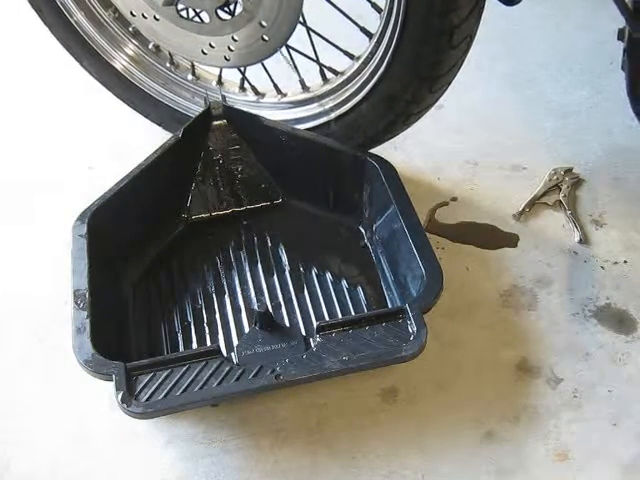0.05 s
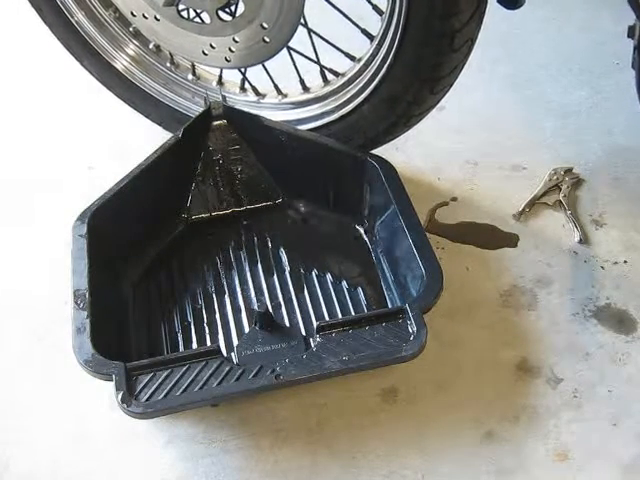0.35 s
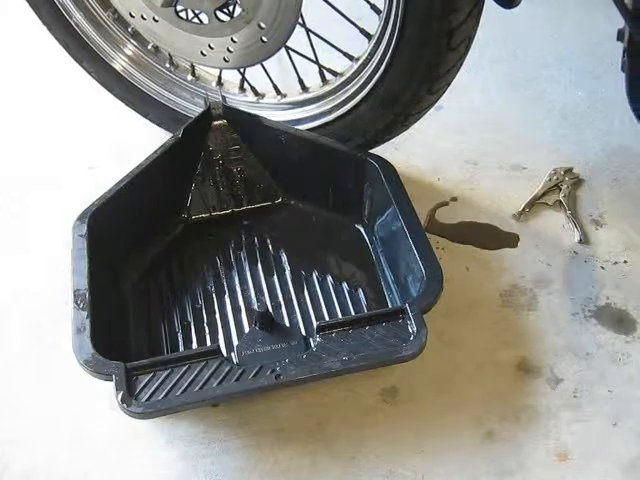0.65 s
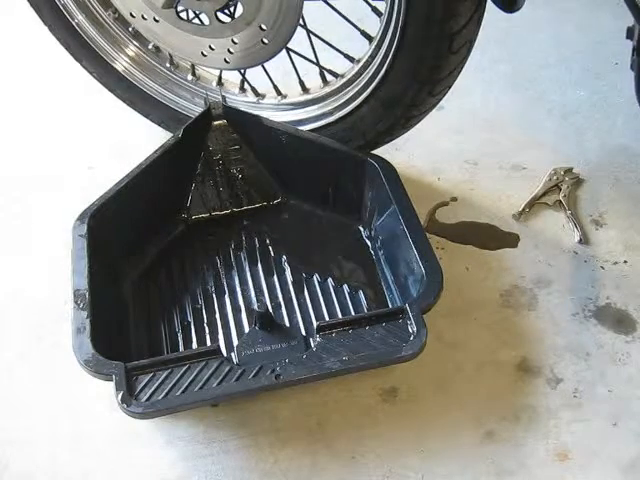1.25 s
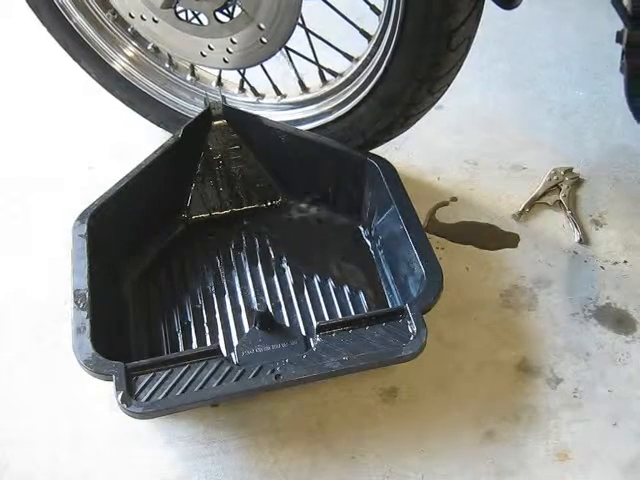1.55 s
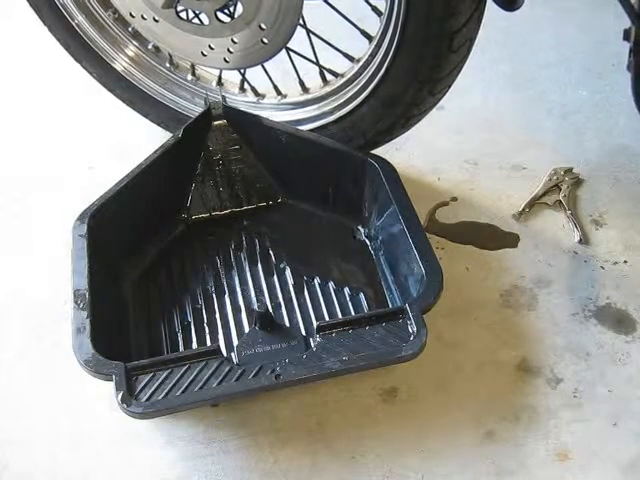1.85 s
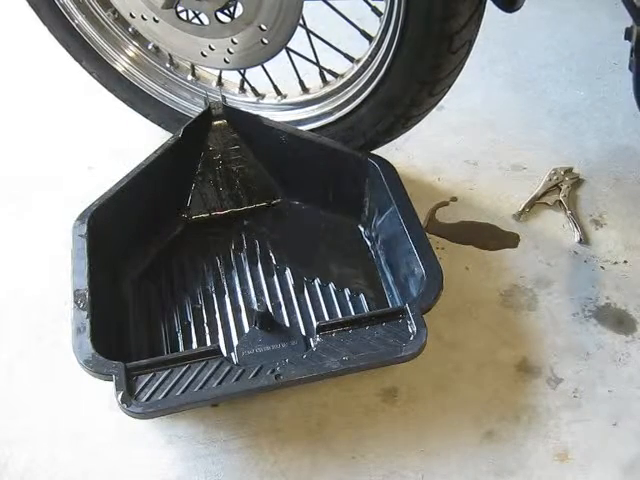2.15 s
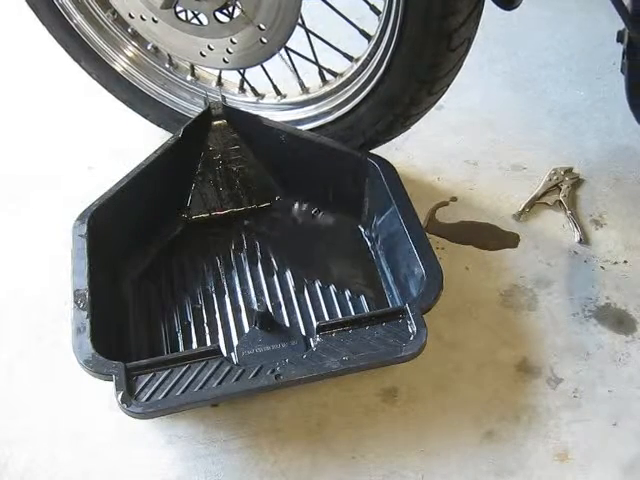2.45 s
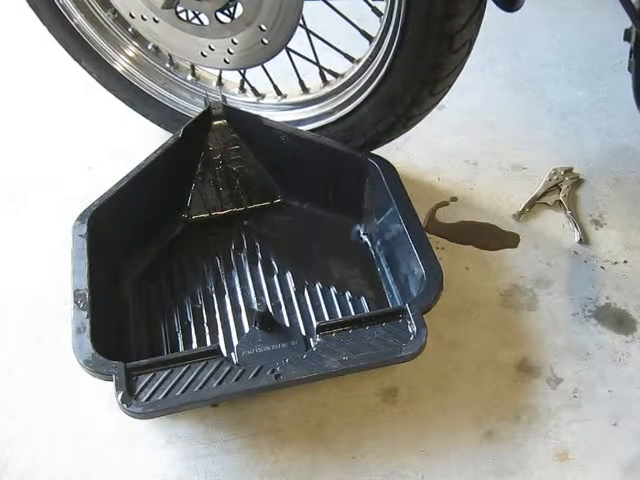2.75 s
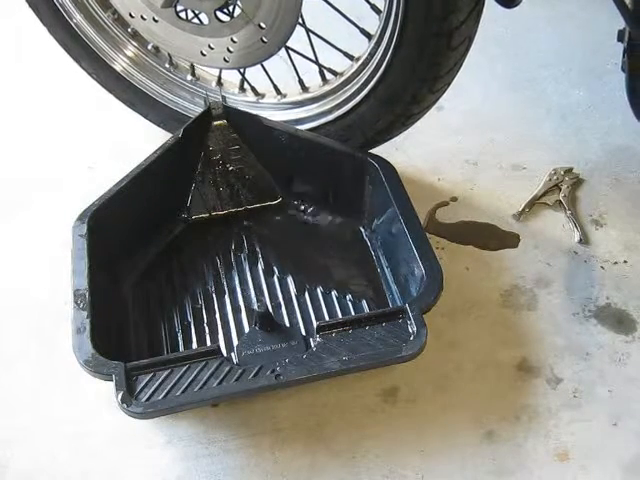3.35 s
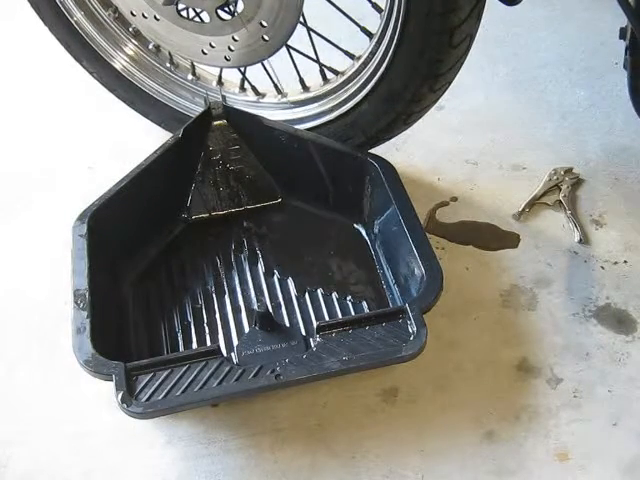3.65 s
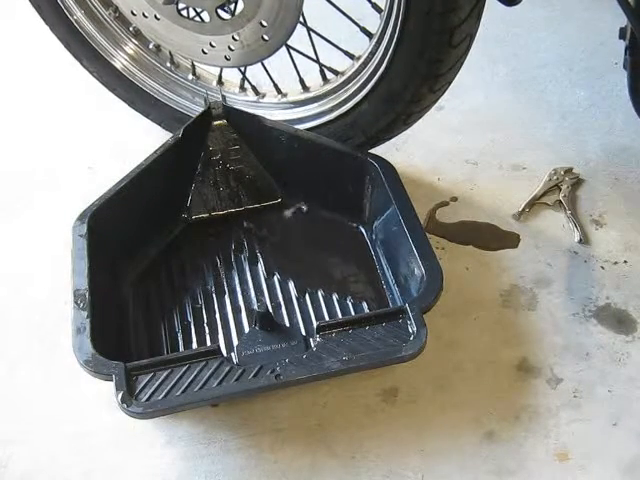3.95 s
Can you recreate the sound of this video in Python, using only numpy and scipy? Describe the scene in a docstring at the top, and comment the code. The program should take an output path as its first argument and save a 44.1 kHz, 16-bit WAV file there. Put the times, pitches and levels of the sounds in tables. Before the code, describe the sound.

Faint drops of oil plop and splutter into a plastic drain pan in a garage.

```python
"""Drops of the last oil draining from a motorcycle fall into a plastic pan on a garage floor.
Each impact slaps the shallow oil, and most excite the pan's damped modes. Bubbles pop,
air gurgles in the drain, and oil and air splutter, with two strong squirts at the end.
The garage reverberates briefly; under it lie a steady hiss and a low drone like far traffic."""
import sys
import numpy as np
from scipy import signal
from scipy.fft import rfft, irfft
from scipy.io import wavfile

SR = 44100
rng = np.random.default_rng(int(sys.argv[2]) if len(sys.argv) > 2 else 0)


def log_audio(samples):
    """Write samples as a 16-bit WAV file to the path given in sys.argv[1]."""
    # one column per channel
    frames = np.atleast_2d(samples).T
    # limit to full scale, then quantise
    limited = np.clip(frames, -1, 1)
    pcm = np.round(limited * 32767).astype(np.int16)
    wavfile.write(sys.argv[1], SR, pcm)


N = 176400
TIME = np.arange(N) / SR
HZ = np.fft.rfftfreq(N, 1 / SR)


def amp(db):
    """Amplitude ratio: a factor of ten per 20 dB."""
    return 10 ** (np.asarray(db) / 20)


def unit(x):
    """Normalisation to an rms of 1."""
    return x / np.sqrt(np.mean(x ** 2) + 1e-20)


def read(points, hz):
    """Interpolation of a table on a log-frequency axis."""
    f, value = np.transpose(points)
    return np.interp(np.log(hz + 1), np.log(f + 1), value)


def add(mix, start_s, sound):
    """Superposition: a sound sums into the mix from its start time."""
    part = mix[round(start_s * SR):][:len(sound)]
    part += sound[:len(part)]


def colour(x, points):
    """Linear filtering: the spectrum is multiplied by a gain curve given in dB."""
    return irfft(rfft(x) * amp(read(points, HZ)), N)


def swell(t, swell_s):
    """Critically damped envelope: it rises to 1 at the swell time, then decays."""
    return t / swell_s * np.exp(1 - t / swell_s)


def ring(hz, swell_s, glide=0):
    """Damped oscillation whose pitch may glide, in octaves per second."""
    t = TIME[:SR // 10]
    phase = 2 * np.pi * np.cumsum(hz * 2 ** (glide * t)) / SR
    return swell(t, swell_s) * np.sin(phase)


def hiss():
    """Stationary broadband noise: the steady background of the room."""
    # Room noise spectrum (frequency [Hz], relative density [dB])
    spectrum = [(15, -65), (25, -20), (96, -3.5), (224, -8), (264, -11.5), (342, -9.5), (423, -12),
                (602, -14), (661, -13), (710, -13), (964, -20), (2050, -22.5), (3780, -20.5), (5650, -31),
                (6980, -58.5), (9070, -96.5)]
    return amp(-46.5) * unit(colour(rng.standard_normal(N), spectrum))


def drone():
    """Amplitude-modulated noise: a far, hollow drone swells and fades around a narrow-band hum."""
    # Drone spectrum (frequency [Hz], relative density [dB])
    spectrum = [(60, -28), (150, -5.5), (280, -11), (320, -3.5), (365, 0), (430, -3), (480, -4.5),
                (545, -2.5), (680, -20), (1000, -19), (2000, -71)]
    # Envelopes of the drone's body and its hum (time [s], level [dB])
    body_levels = [(0, -45.5), (.3, -43), (.5, -35), (.8, -36), (1.1, -40), (1.6, -51.5), (3.0, -56.5),
                   (3.55, -44.5), (4, -51)]
    hum_levels = [(0, -57), (.3, -50), (.58, -37.5), (.9, -41), (1.1, -37.5), (1.4, -48.5), (1.9, -62),
                  (2.3, -48), (2.7, -62), (3.42, -44), (3.7, -50), (4, -54)]
    hum_hz, width_hz = 334.8, 88
    body = unit(colour(rng.standard_normal(N), spectrum))
    band = 1 / (1 + (2 * (HZ - hum_hz) / width_hz) ** 2) ** 2
    hum = unit(irfft(band * np.exp(2j * np.pi * rng.random(len(HZ))), N))
    body_gain = amp(np.interp(TIME, *np.transpose(body_levels)))
    hum_gain = amp(np.interp(TIME, *np.transpose(hum_levels)))
    return body_gain * body + hum_gain * hum


def garage(x):
    """Reverberation: convolution with a diffuse tail, each band decaying at its own exponential rate."""
    # Reverberation time of the garage (frequency [Hz], T60 [s])
    decay_times = [(200, 0.52), (1000, 0.39), (3000, 0.37), (7000, 0.43)]
    build_up_s = 0.0086
    hz, t, bands = signal.stft(rng.standard_normal(SR // 2), SR, nperseg=256)
    decay = amp(-60 * t / read(decay_times, hz)[:, None])
    tail = signal.istft(bands * decay, SR)[1]
    tail *= np.minimum(TIME[:len(tail)] / build_up_s, 1) ** 2
    return signal.fftconvolve(x, tail / np.linalg.norm(tail))[:N]


def pan_resonance(x):
    """Resonance: the pan lifts the bands around its modes; the overall level is preserved."""
    # Modes of the pan (frequency [Hz], width [Hz], gain [dB])
    modes = [(2010, 82, 6.5), (3120, 210, 5), (3830, 68, 3), (4320, 90, 5)]
    lift_db = sum(db / (1 + (2 * (HZ - hz) / width) ** 2) for hz, width, db in modes)
    return np.std(x) * unit(irfft(rfft(x) * amp(lift_db), N))


def gurgles():
    """Bubble resonance: air drawn through the oil gives soft blips, roughened by random modulation."""
    # Air bubbles in the drain (time [s], frequency [Hz], level [dB], swell time [s])
    bubbles = [(0.109, 2825, -48, 0.012), (0.865, 2417, -41, 0.011), (0.869, 3080, -39, 0.0092),
               (.868, 3680, -41, 0.0075), (0.925, 3176, -32.5, 0.0078), (.933, 3650, -37.5, 0.0046),
               (.958, 3360, -41, 0.0088), (.985, 2290, -38.5, 0.0098), (.992, 1527, -45, 0.0073),
               (1.009, 4470, -46, 0.005), (1.026, 3760, -39.5, 0.0075), (1.03, 3150, -38, 0.0051),
               (1.040, 2014, -38.5, 0.01), (1.138, 1600, -38.5, 0.0022), (1.143, 2040, -29.5, .003),
               (1.366, 2020, -47, 0.0097), (1.865, 1122, -43.5, 0.021), (2.028, 2566, -34.5, 0.0051),
               (2.055, 2830, -42, 0.005), (2.085, 2526, -32, 0.0034), (2.134, 1083, -40.5, 0.0094),
               (2.637, 1613, -42, 0.0048), (2.686, 4800, -40, 0.0031), (2.700, 2670, -30, 0.004),
               (2.716, 1190, -30.5, 0.0036), (2.720, 1410, -31.5, 0.0085), (2.833, 765, -37, 0.0027),
               (2.868, 3590, -35, 0.0074), (2.868, 3140, -35.5, 0.0047), (3.668, 2506, -24.5, 0.0033),
               (3.703, 1886, -31, .002), (3.729, 1867, -37, 0.0042), (3.752, 1454, -37, 0.0042)]
    half_width_hz, roughness = 240, 0.77
    out, t = np.zeros(N), TIME[:SR // 5]
    band = 1 / (1 + (np.fft.fftfreq(len(t), 1 / SR) / half_width_hz) ** 2)
    for s, hz, db, swell_s in bubbles:
        envelope = swell(t, swell_s)
        fuzz = np.fft.ifft(band * np.exp(2j * np.pi * rng.random(len(t))))
        wobble = np.sqrt(1 - roughness ** 2) + roughness * fuzz / np.std(fuzz)
        wobble /= np.sqrt(np.average(abs(wobble) ** 2, weights=envelope ** 2))
        tone = (wobble * np.exp(2j * np.pi * hz * t)).imag
        add(out, s, amp(db) * envelope * tone)
    return out


def squirts():
    """Shot noise: tiny bubbles, each ringing a few cycles, merge into sprays that build and fall away."""
    # Squirts and splutters of oil and air
    # (peak time [s], level [dB], rise [s], fall [s], centre frequency [Hz], width [octaves])
    spurts = [(0.321, -44, 0.016, 0.02, 3290, 0.23), (0.979, -46.5, 0.038, 0.06, 3700, 0.22),
              (1.831, -40, 0.0051, 0.028, 5170, 0.28), (1.875, -45, 0.052, 0.032, 2890, 0.49),
              (2.10, -50, 0.056, 0.044, 2180, 0.5), (2.099, -38, 0.0035, 0.0061, 5370, 0.077),
              (2.413, -46.5, 0.0063, 0.0042, 3320, 0.45), (2.732, -36, 0.021, 0.044, 2040, 0.42),
              (2.728, -37.5, 0.011, 0.0091, 4800, 0.26), (3.469, -37, 0.013, 0.013, 3640, .5),
              (3.505, -26, 0.011, 0.015, 3600, 0.39), (3.524, -23, 0.013, 0.012, 3320, 0.37),
              (3.522, -31.5, 0.02, 0.016, 756, 0.93), (3.571, -42, 0.098, 0.12, 3520, 0.6),
              (3.675, -23, 0.0045, 0.006, 3860, 0.33), (3.686, -25, .003, 0.0052, 3610, 0.25),
              (3.677, -35, 0.0093, 0.007, 618, 0.71), (3.742, -39.5, 0.036, 0.04, 1950, 0.31),
              (3.760, -34.5, 0.031, 0.028, 4290, 0.49)]
    bubbles_per_s, spread_db, swell_cycles, bands = 5200, 2.7, 0.85, 24
    out, t = np.zeros(N), TIME[:SR // 2]
    middle = t[-1] / 2
    for s, db, rise, fall, centre_hz, octaves in spurts:
        spray = np.zeros(len(t))
        for offset in np.linspace(-2.5, 2.5, bands) + rng.uniform(-.1, .1, bands):
            hz = min(centre_hz * 2 ** (offset * octaves), SR / 4)
            strengths = amp(spread_db * rng.exponential(1, len(t))) * rng.choice([-1, 1], len(t))
            impulses = strengths * (rng.random(len(t)) < bubbles_per_s / bands / SR)
            ringing = signal.fftconvolve(impulses, ring(hz, swell_cycles / hz))[:len(t)]
            spray += np.exp(-(offset / 2) ** 2) * unit(ringing)
        from_peak = np.maximum((middle - t) / rise, (t - middle) / fall)
        envelope = np.exp(-from_peak ** 0.94)
        add(out, s - middle, amp(db) * envelope * unit(spray))
    return out


def pops():
    """Transient excitation: a bursting bubble or a drop's slap gives a tick and a damped ring."""
    # Short ringing pops and ticks in the pan: bursting bubbles and one drop's slap
    # (time [s], frequency [Hz], level [dB], swell time [s], glide [octaves/s], relative tick level [dB])
    transients = [(.2582, 733, -30.5, 0.00096, -4, -12), (0.2596, 1530, -30, 0.00083, 0.5, -3.5),
                  (0.2946, 3030, -21, 0.00036, -10, 0), (0.2962, 3060, -16, 0.00083, -20, -15),
                  (0.296, 3750, -26, 0.0011, -6.5, -21), (0.2989, 2490, -20.5, 0.0011, -36, -25.5),
                  (.7180, 3770, -38.5, 0.0012, 20, 5), (0.755, 5390, -31, 0.00029, -7, 0.5),
                  (1.102, 1580, -27.5, 0.00077, 11, 1), (1.1035, 2290, -20.5, 0.00063, -4.5, -1.5),
                  (1.5523, 4030, -38, 0.0013, -18, 8), (2.654, 4210, -23.5, 0.00067, -9, -6),
                  (3.464, 2100, -32.5, 0.00075, -3, 6.5), (3.5045, 3530, -16.5, 0.00019, -3, -4.5),
                  (3.635, 3600, -31, 0.00032, 1, -7), (3.807, 3400, -35, .0003, 0, -2)]
    tick_decay_s, tick_cutoff_hz = 0.0026, 700
    out, t = np.zeros(N), TIME[:SR // 10]
    high_pass = signal.butter(1, tick_cutoff_hz, "high", fs=SR)
    for s, hz, db, swell_s, glide, tick_db in transients:
        noise = rng.standard_normal(len(t)) * np.exp(-t / tick_decay_s)
        tick = amp(tick_db) * signal.lfilter(*high_pass, noise)
        add(out, s, amp(db) * (ring(hz, swell_s, glide) + tick))
    return out


def drops():
    """Impact excitation: each drop slaps the oil film and rings the pan's modes for a few cycles."""
    # Drops landing (time [s], level [dB], relative slap level [dB], pitch [ratio], ring length [ratio])
    impacts = [(0.2154, -22.5, -2.5, 1.036, 0.63), (1.0564, -21.5, -2, 1, 1.02),
               (1.9200, -22.5, 0.5, 1.012, 0.84), (2.8042, -26.5, -1.5, 1.03, 1.12)]
    # Partials of the pan's plop and the film's slap, which each drop scales
    # (delay [s], base frequency [Hz], relative level [dB], base swell time [s])
    plop = [(0.00022, 977, 1, 0.0018), (0.0006, 1540, -9, 0.001), (0.00028, 682, -9, 0.0015)]
    slap = [(0, 5250, -5, 0.00017), (.0009, 2460, 0.5, 0.00066), (.0009, 3040, -6, 0.00076),
            (.0016, 3850, -10, 0.00051)]
    # Pan floor thumping under heavier splashes (time [s], frequency [Hz], level [dB], swell time [s])
    thumps = [(0.293, 64.3, -35, 0.0016), (1.1, 318, -31.5, 0.0018), (3.784, 274, -29.5, 0.0028),
              (3.788, 614, -29, 0.00077)]
    out = np.zeros(N)
    for s, db, slap_db, pitch, length in impacts:
        for delay, hz, mode_db, swell_s in plop:
            add(out, s + delay, amp(db + mode_db) * ring(hz * pitch, swell_s * length))
        for delay, hz, mode_db, swell_s in slap:
            add(out, s + delay, amp(db + slap_db + mode_db) * ring(hz * pitch, swell_s))
    for s, hz, db, swell_s in thumps:
        add(out, s, amp(db) * ring(hz, swell_s))
    return out


def scene():
    """Superposition of the oil's direct sound, its reverberant field and the background."""
    # Microphone response to the oil sounds, rolling off in the treble (frequency [Hz], gain [dB])
    response = [(20, 6.5), (4300, 1.5), (5200, 1), (6000, -6.5), (6600, -16.5), (7100, -36.5)]
    pan, popping, drain, spray = drops(), pops(), gurgles(), pan_resonance(squirts())
    direct = pan + popping + drain + spray
    reverberant = garage(amp(-7.5) * pan + amp(-15) * popping + amp(-6.5) * drain + amp(-9) * spray)
    return (colour(direct + reverberant, response) + drone() + hiss())[None]


def record(dry):
    """Band limiting: a steep low-pass filter removes the highest treble."""
    cutoff_hz = 7150
    low_pass = signal.firwin(401, cutoff_hz, window=("kaiser", 9), fs=SR)
    return signal.oaconvolve(dry, low_pass[None], "same")


dry = scene()
out = record(dry)
log_audio(out)
```